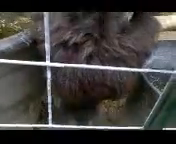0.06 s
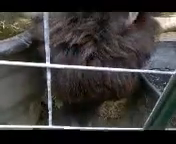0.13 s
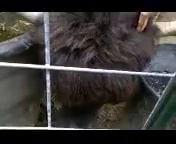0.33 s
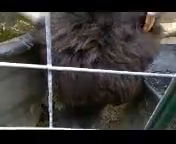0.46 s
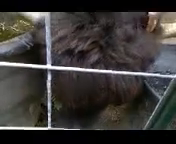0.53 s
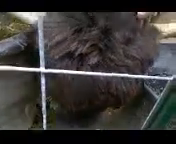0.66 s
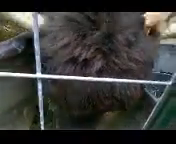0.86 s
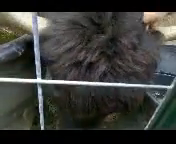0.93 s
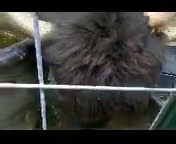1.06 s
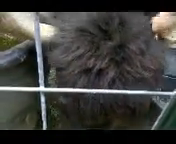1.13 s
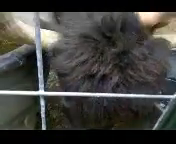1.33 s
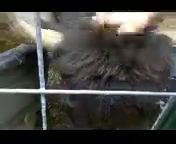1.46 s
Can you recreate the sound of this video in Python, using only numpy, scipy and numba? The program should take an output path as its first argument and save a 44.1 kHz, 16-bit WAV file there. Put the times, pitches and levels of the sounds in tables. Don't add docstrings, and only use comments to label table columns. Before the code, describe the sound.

Soft, low, rising grunts from a big shaggy animal by a fence, with distant bird screeches and hiss

```python
import sys
import numpy as np
from scipy import signal
from scipy.io import wavfile
from scipy.ndimage import uniform_filter1d, map_coordinates
from numba import njit

SR = 44100
rng = np.random.default_rng(int(sys.argv[2]) if len(sys.argv) > 2 else 0)


def gain_from_decibels(decibels):
    exponent = np.asarray(decibels, float) / 20
    return 10 ** exponent


def int16_out(signal):
    q = np.round(np.clip(np.atleast_2d(signal).T, -1, 1) * 32767)
    wavfile.write(sys.argv[1], SR, q.astype(np.int16))


N = 66150


def level(x, db):
    return x * gain_from_decibels(db) / np.sqrt(np.mean(x ** 2))


@njit
def resonator(x, hz, width):
    y, band, low = np.empty(len(x)), 0., 0.
    g, damping = np.tan(np.pi * hz / SR), width / hz
    for i in range(len(x)):
        v = (band + g * (x[i] - low)) / (1 + g * (g + damping))
        low += 2 * g * v
        band = 2 * v - band
        y[i] = damping * v
    return y


def walk(rate_hz):
    hold = max(int(SR / rate_hz), 1)
    steps = np.repeat(rng.standard_normal(N)[:N // hold + 1], hold)
    return 1.73 * uniform_filter1d(uniform_filter1d(steps, hold), hold)[:N]


def noise(hz, width):
    once = resonator(rng.standard_normal(N), 1. * hz, 1. * width)
    return level(resonator(once, 1. * hz, 1. * width), 0)


def bump(t, start, length):
    return np.sin(np.pi * np.clip((t - start) / length, 0, 1)) ** 2


def late(x, samples):
    left = map_coordinates(x, [np.arange(N) - samples], mode="nearest")
    return np.array([left, x])


# f/Hz, width/Hz, level/dB, end t/s
HUMS = [
    (240, 15.6, -59, 1),
    (1020, 57, -72, 1),
]


def hums(t):
    return sum(gain_from_decibels(db - 60 * np.maximum(t - end, 0)) * late(noise(hz, width), 1.0)
               for hz, width, db, end in HUMS)


# t/s, length/s, level/dB, capsule (whole part: 0 left)
PUFFS = [
    (0.4, .04, -45, 0),
    (0.96, 0.081, -51, 0.91),
    (1.15, 0.13, -60, 0.92),
]


def puffs(t):
    out = np.zeros((2, N))
    for s, length, db, capsule in PUFFS:
        out[int(capsule)] += gain_from_decibels(db) * bump(t, s, length) * noise(93, 40)
    return out


# f/Hz, level/dB per third octave, likeness between capsules (0-1)
YARD = [(31.3, -82, 0.6), (93, -72, 0.44), (179, -59, 1), (390, -70.5, 0.5), (1050, -77.5, 0.1),
        (2430, -79, 0), (6500, -76, 0), (13300, -90.5, 0)]
# t/s, level/dB
BREEZE = [(0, -3), (.2, -2), (.45, 6), (.7, 2), (1., 2.5), (1.28, 2), (1.5, 1)]


def yard(t):
    out, swell = 0, np.interp(t, *np.array(BREEZE).T)
    f, db, like = np.array(YARD).T
    for hz in 30 * 2 ** np.arange(0, 9, 1 / 3):
        coherence = np.clip(np.interp(np.log(hz), np.log(f), like), 0, 1)
        both = np.sqrt((1 + coherence) / 2) * noise(hz, hz * 0.43)
        apart = np.sqrt((1 - coherence) / 2) * noise(hz, hz * 0.75)
        band_db = np.interp(np.log(hz), np.log(f), db) + swell + 0.37 * walk(8.36)
        out = out + gain_from_decibels(band_db) * np.array([both + apart, both - apart])
    return out + hums(t) + puffs(t)


# centre f/Hz, level/dB
SCUFFS = [(4387, -67), (9800, -70.5), (12570, -63), (12190, -64), (13500, -61), (13500, -59.5),
          (13700, -65.5), (4470, -66), (10400, -68), (12500, -67)]
SCUFFS_S = [.79, .42, .6, .78, 1.205, 1.245, 1.31, 1.26, 1.25, 1.3]
SCUFF_LENGTHS_S = [.03, .09, .08, .05, .04, .07, .04, .012, .06, .3]


def scuffs(t):
    out = 0
    for s, length, (hz, db) in zip(SCUFFS_S, SCUFF_LENGTHS_S, SCUFFS):
        out = out + gain_from_decibels(db + 2.2 * walk(400)) * bump(t, s, length) * noise(hz, hz * 0.3)
    return out


# level/dB, f/Hz
TICKS = [
    (-44, 1670),
    (-54, 4300),
    (-50.5, 1380),
    (-50, 1800),
    (-43, 1340),
    (-48, 3500),
    (-31, 482),
    (-62, 280),
    (-49, 500),
]
# t/s, ring to -30 dB/s
TICKS_S = [(.7948, .004), (.7948, .003), (.7998, .004), (.8048, .005), (.8082, .004), (.8075, .003),
           (.8207, .011), (.525, .008), (1.052, .008)]


def ticks(t):
    out = 0
    for (s, ring), (db, hz) in zip(TICKS_S, TICKS):
        age = np.maximum(t - s, 0)
        attack = np.minimum(age * hz * 2, 1)
        out = out + gain_from_decibels(db) * np.sin(2 * np.pi * hz * age) * gain_from_decibels(-30 * age / ring) * attack
    return out


# t/s, length/s, f/Hz, level/dB
CHIRPS = [
    (0.729, 0.1, 7580, -65),
    (0.746, 0.12, 8400, -68.5),
    (0.879, 0.077, 7440, -66.5),
    (0.887, 0.043, 8660, -61),
    (1.142, 0.041, 7540, -67),
    (1.196, 0.025, 8600, -67),
]


def chirps(t):
    return sum(gain_from_decibels(db) * bump(t, s, length) * noise(hz, hz * 0.12) for s, length, hz, db in CHIRPS)


# f/Hz, level/dB
FLARES = [(7340, -61.5), (7150, -73), (4980, -64.5), (3980, -68.5), (3920, -67), (5020, -64)]
# t/s, length/s
FLARES_S = [(1.33, .1), (1.40, .15), (1.44, .1), (1.33, .12), (1.22, .1), (.26, .2)]


def flares(t):
    out = 0
    for (s, length), (hz, db) in zip(FLARES_S, FLARES):
        out = out + gain_from_decibels(db + 1.45 * walk(40.4)) * bump(t, s, length) * noise(hz, hz * 0.046)
    return out


# t/s, f/Hz, level/dB
SCREECH = [(0, 1169, -68.5), (0.061, 1177, -60), (0.18, 1192, -60.5), (0.279, 1240, -55.5),
           (0.422, 1228, -65), (0.603, 1213, -73.5), (0.722, 1243, -83), (1.185, 1534, -95),
           (1.198, 1476, -74), (1.228, 1196, -58), (1.33, 1199, -59), (1.439, 1204, -58.5),
           (1.5, 1248, -56.5)]
SCREECH_ORDERS_DB = [-9.5, 8.5, 3.5, -8, 4.5, -4]
LATE_ORDERS_DB = [-12.5, 4.5, 8, -9, -8, 6]
# f/Hz, width/Hz, level/dB
RASP = [(1190, 1050, -3), (2384, 160, -6), (2645, 230, 2.5), (3775, 330, 0.5), (5570, 4700, 5),
        (6060, 830, 7.5), (7500, 4800, -5.5)]


def fowl(t):
    s, hz, db = np.array(SCREECH).T
    pitch = np.interp(t, s, hz) * (1 + 0.0069 * walk(80))
    phase = 2 * np.pi * np.cumsum(pitch) / SR
    stack = 0
    for k, (first_db, second_db) in enumerate(zip(SCREECH_ORDERS_DB, LATE_ORDERS_DB), 1):
        order_db = np.where(t < 1, first_db, second_db) + 2.54 * walk(30.8)
        stack = stack + gain_from_decibels(order_db) * np.sin(k * phase)
    rasp = 0
    for f, width, rasp_db in RASP:
        scattered = np.array([noise(f, width), noise(f, width)])
        rasp = rasp + gain_from_decibels(rasp_db + 2.65 * walk(15)) * (scattered + 0.32 * noise(f, width))
    left_lag = -9.6
    return (late(level(stack, 0), left_lag) + level(rasp, 3)) * gain_from_decibels(np.interp(t, s, db))


@njit
def walls(x, lags, gain, damp):
    line, soft, out = np.zeros((8, 8192)), np.zeros(8), np.zeros((2, len(x)))
    for i in range(len(x)):
        total = 0.
        for k in range(8):
            soft[k] += (1 - damp) * (gain[k] * line[k, (i - lags[k]) & 8191] - soft[k])
            total += soft[k]
            out[k % 2, i] += soft[k]
        for k in range(8):
            line[k, i & 8191] = x[i] + soft[k] - total / 4
    return out


def shed(beast, far):
    t60_s = 0.63
    lags = rng.integers(900, 4600, 8)
    wet = walls(gain_from_decibels(-10.5) * beast + gain_from_decibels(-8.5) * far, lags, gain_from_decibels(-60 * lags / SR / t60_s), 0.2)
    return wet + 0.34 * wet[::-1]


# f/Hz, level/dB
THROAT = [(150, -3), (330, 9.5), (420, 2), (610, -2), (780, -11.5), (960, -25), (1280, -30), (2000, -45.5)]


def voice(pitch, partials_db, bright_db, rough):
    f, throat_db = np.array(THROAT).T
    pitch = pitch * (1 + 0.0119 * walk(60.6))
    phase = 2 * np.pi * np.cumsum(pitch) / SR
    out = 0
    for k, partial_db in enumerate(partials_db, 1):
        octaves = np.log2(np.maximum(k * pitch / 500, 1))
        tone_db = np.interp(np.log(k * pitch), np.log(f), throat_db) + bright_db * octaves
        tone_db = tone_db + 1.5 * walk(44.68)
        turn = k * phase + 2 * np.pi * rng.random()
        depth = rough * (1 + 0.8 * 2 * octaves)
        sidebands = walk(150) * np.sin(turn) + walk(150) * np.cos(turn)
        smeared = (np.sin(turn) + depth * sidebands) / np.sqrt(1 + depth ** 2)
        out = out + gain_from_decibels(tone_db + partial_db) * smeared
    return out


def grunt(t, rows, second_hz, bright_db, rough, fall_db, rasp_db):
    s, hz, db, mouth_db, second_db = np.array(rows).T
    second_pitch = np.interp(t, s[[0, -1]], second_hz)
    hz, db, mouth_db, second_db = (np.interp(t, s, column) for column in (hz, db, mouth_db, second_db))
    main_db = [0 if k == 2 else -11 if k % 2 else mouth_db for k in range(1, 15)]
    out = voice(hz / 2, main_db, bright_db, rough)
    out = out + voice(second_pitch, [second_db + fall_db * k for k in range(4)], bright_db, rough)
    out = out + gain_from_decibels(rasp_db + 3 * walk(70)) * (noise(380, 120) + 0.6 * noise(540, 150))
    onset_s = .015
    return out * gain_from_decibels(db) * np.clip(np.minimum(t - s[0], s[-1] - t) / onset_s, 0, 1)


# t/s, f/Hz, level/dB, mouth opening as overtone level/dB, second voice level/dB
FIRST_GRUNT = [(0.186, 195.8, -66, -6, -1), (0.218, 239, -48.5, -0.5, -21), (0.24, 257.8, -46, 6, 3),
               (0.257, 284.8, -42, -4, 12), (0.275, 322.7, -43, 5.5, -5.5), (0.323, 309.5, -42.5, 6.5, -11),
               (0.344, 323.4, -53, 7.5, 3), (0.365, 320, -49, -9, 7.5), (0.383, 310, -72, -23, 9)]
SECOND_GRUNT = [(0.453, 190.1, -62, -24, -6), (0.491, 226.3, -39.5, -10, -6.5), (0.509, 248, -46, -1, 0),
                (0.519, 268.6, -45.5, 2.5, 17), (0.54, 296, -44, 7.5, -2.5), (.565, 307.3, -43, 9, 11.5),
                (0.588, 345.5, -40, -6, -9.5), (0.623, 343, -40.5, -19, -6), (0.677, 320, -75, 16, -9)]
THIRD_GRUNT = [(0.732, 204.8, -57, -7, -16), (0.759, 238, -51.5, -2, 12), (0.791, 266.8, -49, 6, 3.5),
               (0.811, 278.2, -48.5, 1, 12), (0.839, 320, -44.5, -2, -3), (0.868, 348.4, -40, -10, -26),
               (0.897, 310.7, -47, -7, -10), (0.919, 327, -49.5, 2, 4), (0.949, 320, -77, 6, -5)]
FOURTH_GRUNT = [(1.015, 199.6, -60, -7, 8), (1.05, 245.5, -48.5, 3, 3), (1.075, 265.7, -49.5, 13.5, -10),
                (1.095, 302.5, -44, 0.5, 0.5), (1.115, 340.2, -45, -12, 4), (1.14, 321.2, -42.5, -10, -11),
                (1.15, 320, -58, 16.5, 13.5), (1.178, 326.6, -51, -2, -6.5), (1.207, 305, -62, -10, 9)]
LAST_GRUNT = [(1.232, 269, -69, 4, -27), (1.279, 266.5, -65.5, 10, -5), (1.331, 251.4, -60, -8, -16),
              (1.389, 281.3, -59, -22, -6.5), (1.472, 240, -71.5, 2, 3.5)]
# start f/Hz, end f/Hz
SECOND_HZ = [(417.1, 385), (428, 390), (438.2, 400), (426.7, 230), (335, 325)]
BRIGHT_DB = [8, -6.5, -5, -12, -6]
ROUGH = [.15, .22, .35, .33, .6]
SECOND_FALL_DB = [-5, -2, -5, -7, -4]
RASP_UNDER_VOICE_DB = [-16, -12, -6, -7, -4]
# f/Hz, width/Hz, level/dB
SHED_RINGS = [
    (401, 17, -8),
    (542.4, 13.5, -3.5),
    (639, 18, -11.5),
]


def animal(t):
    rows = (FIRST_GRUNT, SECOND_GRUNT, THIRD_GRUNT, FOURTH_GRUNT, LAST_GRUNT)
    settings = zip(rows, SECOND_HZ, BRIGHT_DB, ROUGH, SECOND_FALL_DB, RASP_UNDER_VOICE_DB)
    beast = sum(grunt(t, *each) for each in settings)
    return beast + sum(gain_from_decibels(db) * resonator(beast, 1. * hz, 1. * width) for hz, width, db in SHED_RINGS)


def chest_and_muzzle(beast):
    chest = resonator(beast, 320., 60.)
    return late(beast - chest, 7.8) + late(chest, 1)


def scene():
    t = np.arange(N) / SR
    beast, screech = animal(t), fowl(t)
    birds = chirps(t) + flares(t)
    litter = scuffs(t) + ticks(t)
    direct = chest_and_muzzle(beast) + screech + late(birds, 1.0) + late(litter, 0.57)
    return direct + shed(beast, screech[0] + birds) + yard(t)


STEER_TAPS = [.35, .6, .05]


def steer(dry):
    taps = np.r_[np.zeros(14), STEER_TAPS]
    return dry - 0.99 * signal.lfilter(taps, 1, dry[::-1])


def top_cut(x):
    return signal.sosfilt(signal.butter(12, 14110, fs=SR, output="sos"), x)


def record(dry):
    hiss = gain_from_decibels(-65) * np.array([noise(9500, 19500.0), noise(9500, 18000.0)])
    cut = signal.ellip(10, .2, 70, 14000, fs=SR, output="sos")
    return top_cut(signal.sosfilt(cut, steer(dry) + hiss))


dry = scene()
out = record(dry)
int16_out(out)
```